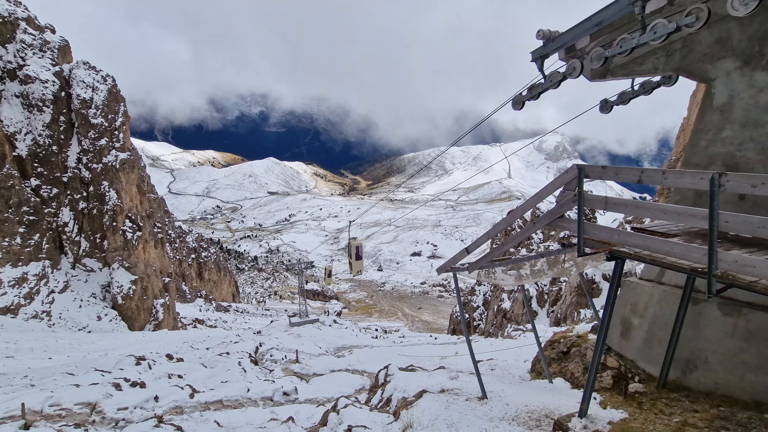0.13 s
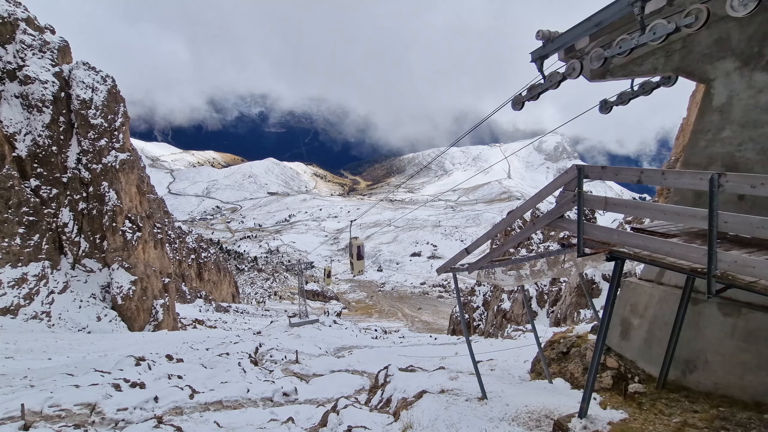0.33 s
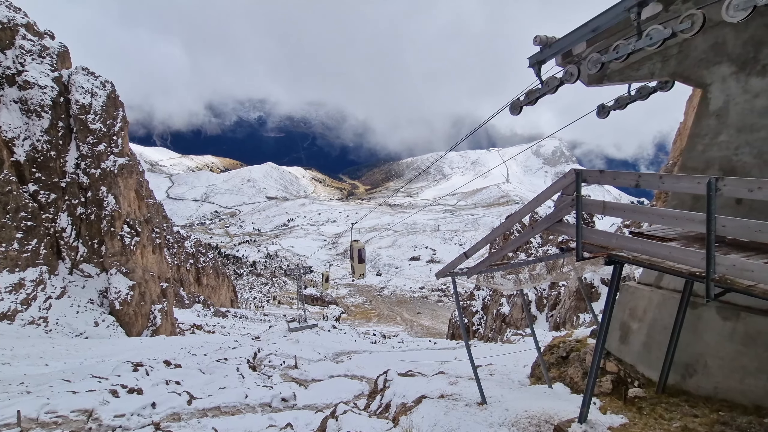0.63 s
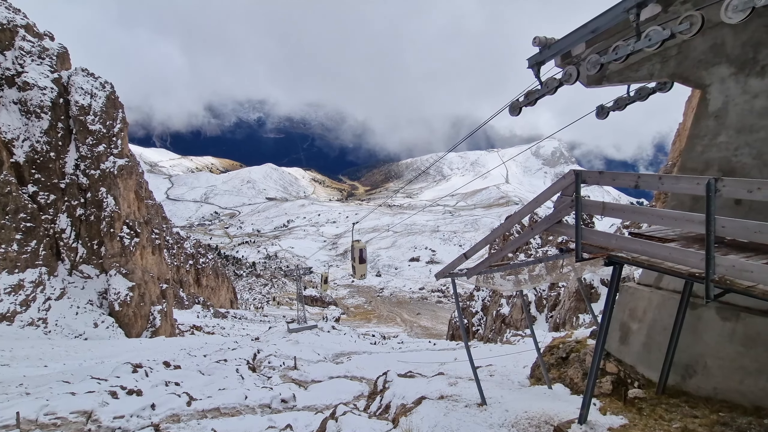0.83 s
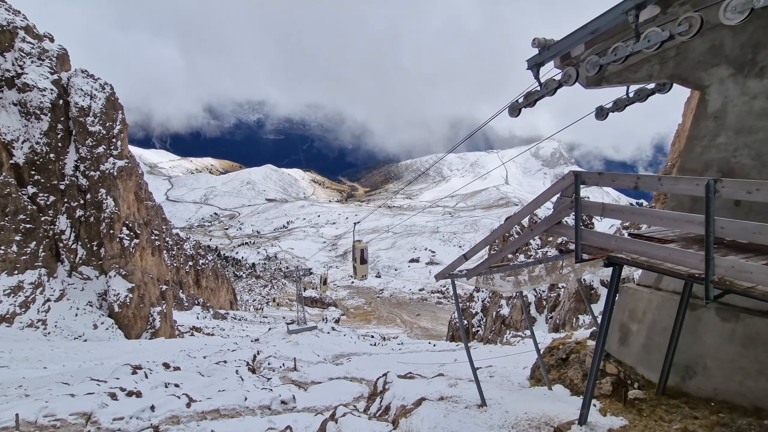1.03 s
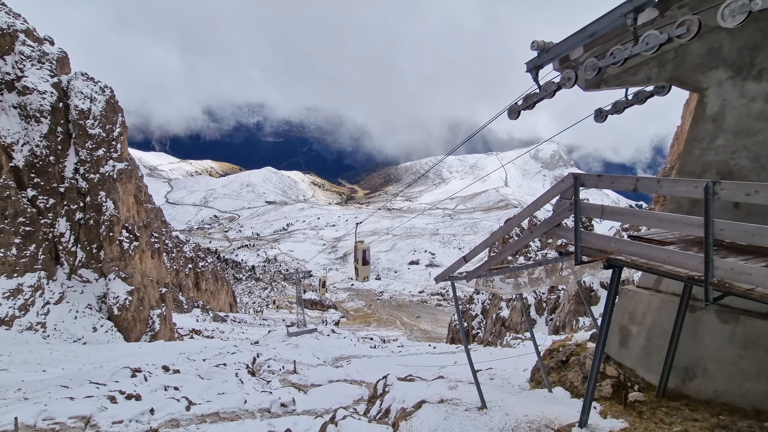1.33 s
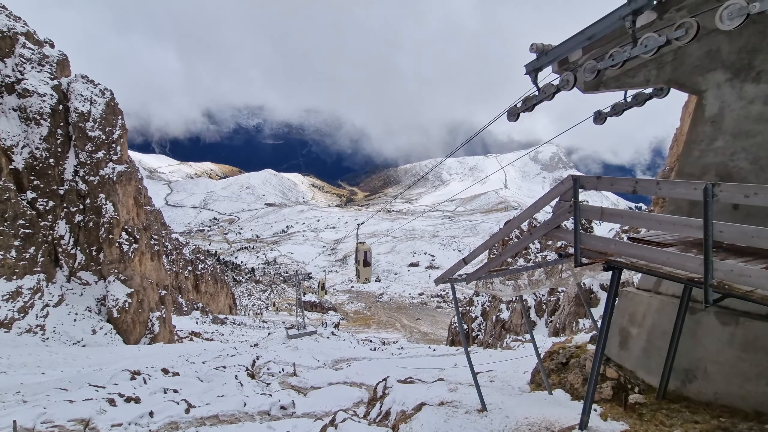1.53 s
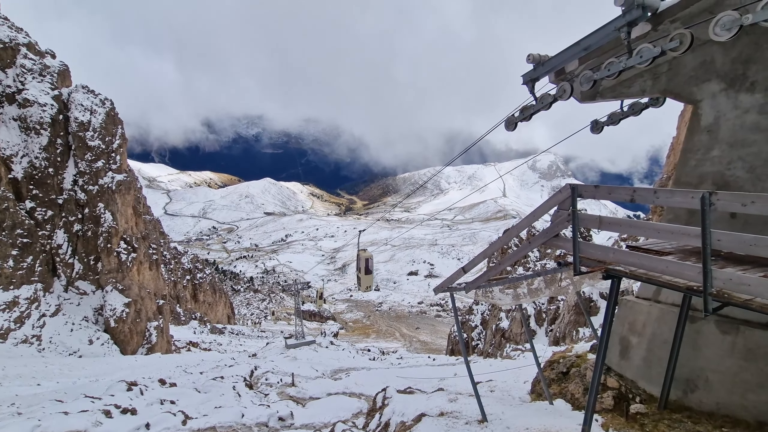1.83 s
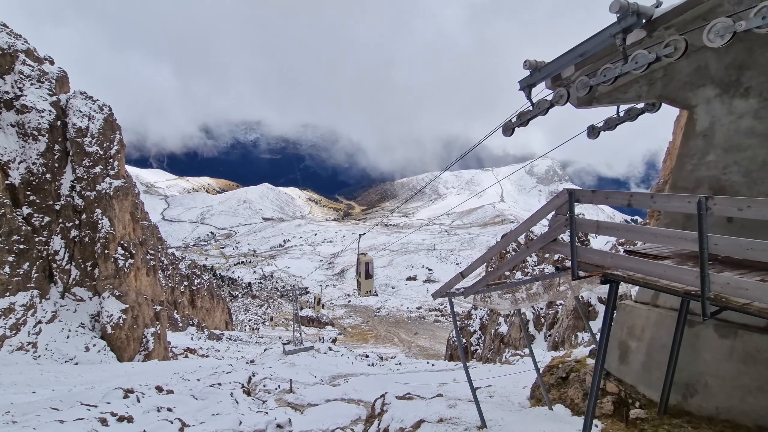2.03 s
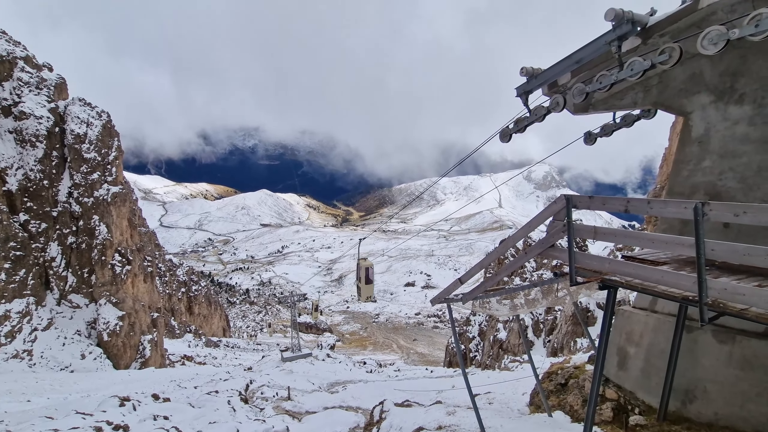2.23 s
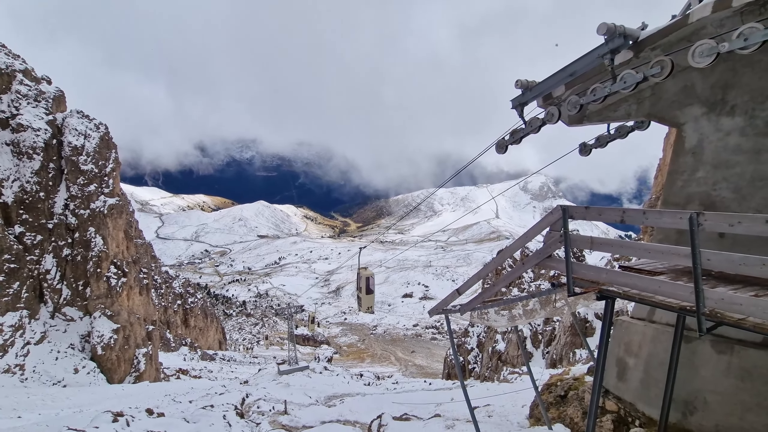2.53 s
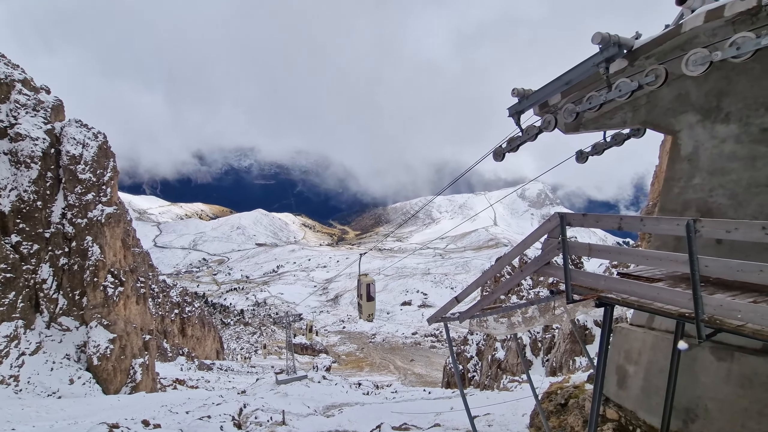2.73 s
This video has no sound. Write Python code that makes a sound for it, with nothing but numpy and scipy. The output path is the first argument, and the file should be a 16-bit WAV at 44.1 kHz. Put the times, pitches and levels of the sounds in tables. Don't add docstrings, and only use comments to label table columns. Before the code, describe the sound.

Cable lift machinery starts abruptly after brief silence and runs continuously: pulley wheels roar, steel rings faintly, rope hisses in quick regular pulses, above a low hum and puffing wind, outdoors at a mountain station, in stereo.

```python
import sys
import numpy as np
from scipy import signal
from scipy.fft import rfft, irfft, next_fast_len
from scipy.io import wavfile
from scipy.ndimage import uniform_filter1d

SR = 44100
rng = np.random.default_rng(int(sys.argv[2]) if len(sys.argv) > 2 else 0)


def natural_amplitude(level_db):
    exponent = np.asarray(level_db, float) / 20
    return 10 ** exponent


def unload_wav(signal):
    wavfile.write(
        sys.argv[1],
        SR,
        np.round(np.clip(np.atleast_2d(signal).T, -1, 1) * 32767).astype(np.int16),
    )


N = 127890
M = next_fast_len(N)
F = np.maximum(np.arange(M // 2 + 1) * SR / M, 1.)
T = np.arange(N) / SR
START_S = .11795
TURN_S = .762


def read(table, hz):
    a = np.array(table)
    return np.interp(np.log(hz), np.log(a[:, 0]), a[:, 1])


def walk(rate):
    hold = int(SR / rate)
    steps = np.repeat(rng.standard_normal(N // 400 + 1), hold)[:N + hold]
    return 1.37 * uniform_filter1d(uniform_filter1d(steps, hold), hold)[:N]


def level(x, db):
    return x * natural_amplitude(db) / np.sqrt(np.mean(x ** 2))


def turn(at_s, period_s, sharp):
    return np.exp(sharp * (np.cos(2 * np.pi * (T - at_s) / period_s) - 1))


def air():
    # frequency in Hz, likeness of the ports 0-1
    alike = [(45, .93), (100, .76), (300, .7), (550, .76), (1200, .78), (2100, .78), (2700, .35),
             (9000, .42)]
    coherence = np.clip(read(alike, F), 0, 1)
    common, left, right = (rfft(rng.standard_normal(M)) for _ in range(3))
    shared = np.sqrt(coherence) * common
    own = np.sqrt(1 - coherence)
    return np.array([shared + own * left, shared + own * right])


def rush(table, db, shared_db, flicker_db, rate):
    low_hz, high_hz = table[0][0], table[-1][0]
    noise = air() * natural_amplitude(read(table, F)) * (F > low_hz / 2) * (F < high_hz * 2)
    out = 0
    for hz in low_hz * 2 ** np.arange(-.5, np.log2(high_hz / low_hz) + .75, .5):
        band = np.cos(np.pi * np.clip(np.log2(F / hz), -.5, .5))
        out = out + irfft(noise * band, M)[:, :N] * natural_amplitude(flicker_db * walk(rate) + shared_db(hz))
    return level(out, db)


def swells(table, rough_db):
    size = [natural_amplitude(db) * np.exp(-((T - at) / half) ** 2) for at, half, hz, db in table]
    weighted_hz = sum((s + 1e-9) * row[2] for s, row in zip(size, table))
    hz = weighted_hz / (sum(size) + 1e-9 * len(table))
    phase = 2 * np.pi * np.cumsum(hz * (T > START_S)) / SR
    return np.sqrt(2) * sum(size) * natural_amplitude(rough_db * walk(17)), phase


def boom():
    # centre in s, half length in s, pitch in Hz, level in dB
    frame_swells = [(.18, 0.13, 80.1, -31), (.48, 0.044, 79.6, -34.5), (.79, 0.068, 80.4, -32.5),
                    (.89, 0.056, 81.5, -32), (1.0, 0.044, 81.4, -31), (1.3, .05, 80.8, -44),
                    (1.69, 0.074, 80, -29.5), (1.79, 0.023, 78.9, -36.5), (2.15, 0.045, 81.05, -40.5),
                    (2.27, 0.031, 79.76, -38), (2.36, .055, 80.7, -31.5), (2.67, 0.076, 80.5, -39)]
    size, phase = swells(frame_swells, -2)
    skew = natural_amplitude(-34) * walk(9.2) * np.array([[1], [-1]])
    return size * np.cos(phase + 3.64 - np.pi + skew)


def wind_rumble():
    # frequency in Hz, level in dB per Hz
    wind_colour = [(20, -25), (41, -2.5), (60, -1.5), (82, -2), (110, -7.5), (200, -20.5), (330, -32.5),
                   (500, -49.5)]
    # time in s, gust in dB
    gusts = [(.12, -1.5), (.5, -2.5), (.65, 6.5), (.85, -7), (1.02, -1), (1.22, 2), (1.45, 5.5),
             (1.65, -0.5), (1.87, 2), (2.1, 1.5), (2.3, 2.5), (2.55, 1), (2.75, 5), (2.9, -7.5)]
    gust_db = np.interp(T, *np.array(gusts).T)
    return rush(wind_colour, -38.5, lambda hz: gust_db * min(55 / hz, 1) ** 2, 2.96, 14)


def sheave_roar(joint, shake):
    # frequency in Hz, level in dB per Hz
    roll_colour = [(200, -10.5), (370, -15), (550, -6.5), (950, -7.5), (1400, 0.5), (2000, 1.5),
                   (2600, -9.5), (4500, -32)]
    swell_db = 1.2 * joint + .8 * shake + .3 * T
    return rush(roll_colour, -44.5, lambda hz: swell_db, 1.2, 22)


def buffet(x):
    top_hz, puff_db = 600, 4.5
    side = (x[0] - x[1]) / 2
    low = irfft(rfft(side, M) / (1 + (F / top_hz) ** 4), M)[:N]
    puffs = natural_amplitude(puff_db * walk(27.02))
    gain = puffs / np.sqrt(np.mean(puffs ** 2))
    return x + low * (gain - 1) * np.array([[1], [-1]])


def steel(joint):
    # frequency in Hz, width in Hz, level in dB
    modes = [(470, 100, -65.5), (563, 78, -67), (777.8, 32, -60), (1085, 73, -55.5), (1568, 49, -53),
             (1760, 40, -70), (1990, 32, -58), (2081, 9.2, -57.5), (2215, 170, -55.5), (2860, 250, -55.5),
             (3190, 91, -60.5), (3950, 89, -75), (7480, 390, -70)]
    # centre in s, half length in s, pitch in Hz, level in dB
    beam_rings = [(.32, .02, 1085, -54), (.44, .02, 1082, -51.5), (.58, .02, 1112, -53.5),
                  (.665, .008, 390, -55.5), (1.07, .025, 1117, -53.5), (1.2, .025, 1105, -53),
                  (1.41, 0.03, 1092, -59.5), (1.57, .02, 1085, -57.5), (1.69, .024, 474.5, -55.5),
                  (1.81, 0.011, 1074, -49), (1.955, 0.0303, 1103, -52), (2.17, 0.016, 1098, -55),
                  (2.72, .02, 1101, -51), (2.83, 0.015, 1124, -63)]
    noise, out = air(), 0
    for hz, width, db in modes:
        resonance = 1 / (1 + ((F ** 2 - hz ** 2) / (F * width)) ** 2)
        ring = np.fft.ifft(noise * resonance, M)[:, :N]
        waver = np.exp(2j * np.pi * np.cumsum(.008 * hz * walk(11)) / SR)
        out = out + level((ring * waver).real * natural_amplitude(1.3 * walk(9) + 2.5 * joint), db)
    size, phase = swells(beam_rings, 4.1)
    return out + size * np.sin(phase + .7 * walk(70))


def joint_fizz(joint, scrub, shake):
    # frequency in Hz, level in dB per Hz
    rasp_colour = [(4000, -13), (6700, -9), (7600, 5), (8500, 0.5), (10300, -20.5), (12000, -19.5),
                   (15500, -27.5), (17000, -26)]

    def swell_db(hz):
        return (0.9 + 3.0 * (hz > 9500)) * joint + 1.3 * scrub + 0.74 * shake

    return rush(rasp_colour, -57.5, swell_db, 1.0, 55)


def rope_scrub(joint, scrub, shake):
    # frequency in Hz, level in dB per Hz
    scrub_colour = [(1500, -17), (2500, -9), (3300, -2.5), (4500, -7.5), (5500, -11), (6600, -11.5),
                    (8000, -44.5), (9500, -39)]
    swell_db = 6.5 * scrub + 1.5 * joint + .9 * shake
    return rush(scrub_colour, -48.5, lambda hz: swell_db, .8, 25)


def scene():
    joint = turn(.175, TURN_S / 3, 4.2)
    scrub = turn(.555, TURN_S, 0.55)
    shake = walk(19)
    low = buffet(wind_rumble() + sheave_roar(joint, shake))
    ringing = boom() + steel(joint)
    return low + ringing + joint_fizz(joint, scrub, shake) + rope_scrub(joint, scrub, shake)


def low_pass(x):
    return signal.sosfilt(signal.butter(12, 16570, fs=SR, output="sos"), x)


def record(dry):
    # frequency in Hz, gain in dB
    left_colour = [(900, 0.02), (1150, 1), (2050, -2.5), (2800, 2.5), (4100, -4.5), (5100, 2.34),
                   (6600, -2), (12000, -.5)]
    right_colour = [(900, 0), (1150, -0.5), (2050, 3.5), (2700, -6), (4100, 5.5), (5300, -2.5), (6600, 0),
                    (12000, 0)]
    # frequency in Hz, phase lag in radians
    left_lag = [(0, 0), (600, .5), (1800, 3.8), (2050, 6.4), (2600, 8), (3000, 12.3), (4400, 11.3),
                (6000, 15.6), (9300, 15.9), (10500, 17.7)]
    lag = np.exp(-1j * np.interp(F, *np.array(left_lag).T))
    ports = np.array([natural_amplitude(read(left_colour, F)) * lag, natural_amplitude(read(right_colour, F))])
    wet = irfft(rfft(dry, M) * ports, M)[:, :N]
    wet = wet * np.clip((T - START_S) / 3e-5, 0, 1)
    mix = irfft(rfft(wet, M) * (F < 15730), M)[:, :N]
    return low_pass(mix)


dry = scene()
out = record(dry)
unload_wav(out)
```